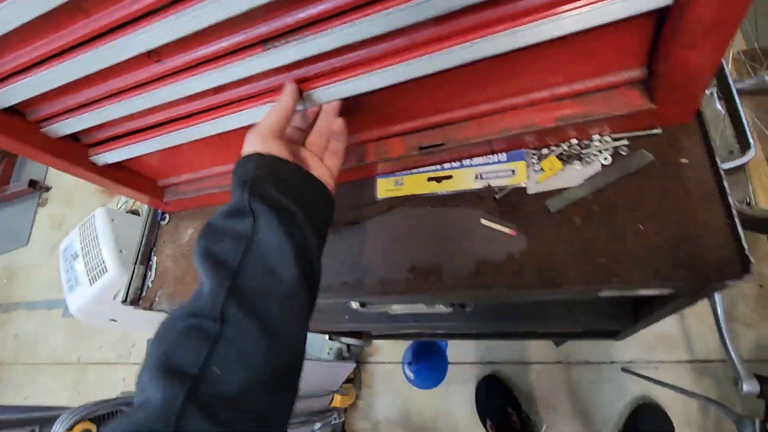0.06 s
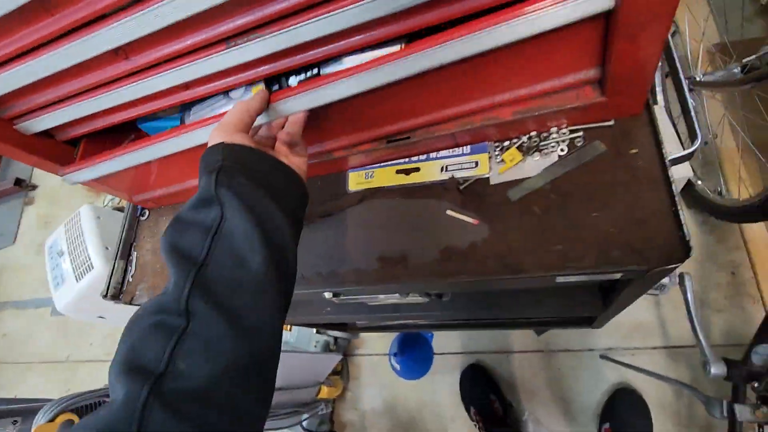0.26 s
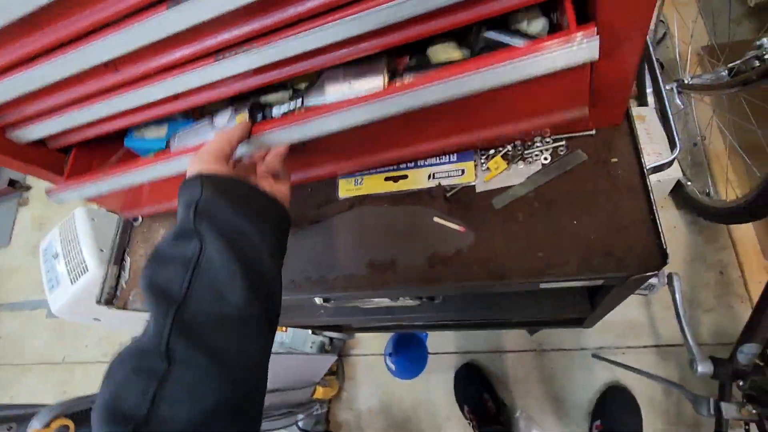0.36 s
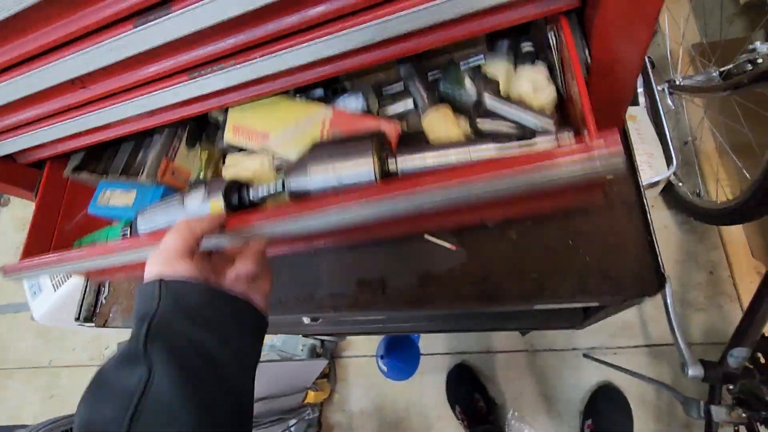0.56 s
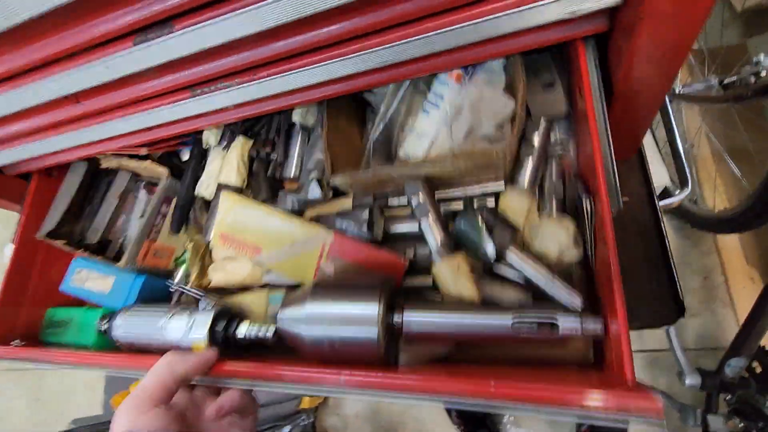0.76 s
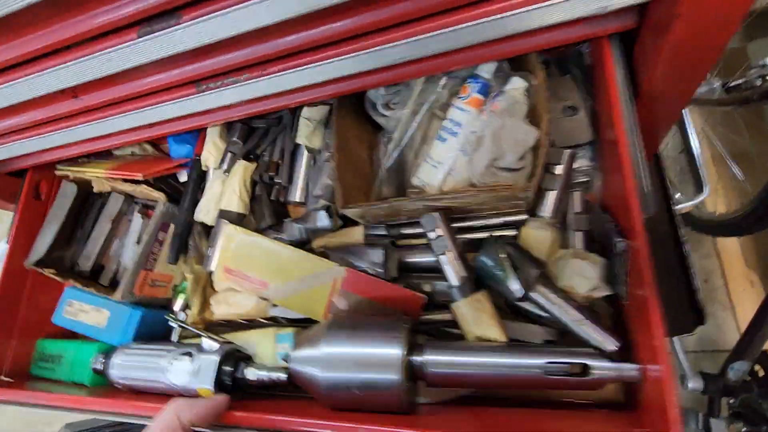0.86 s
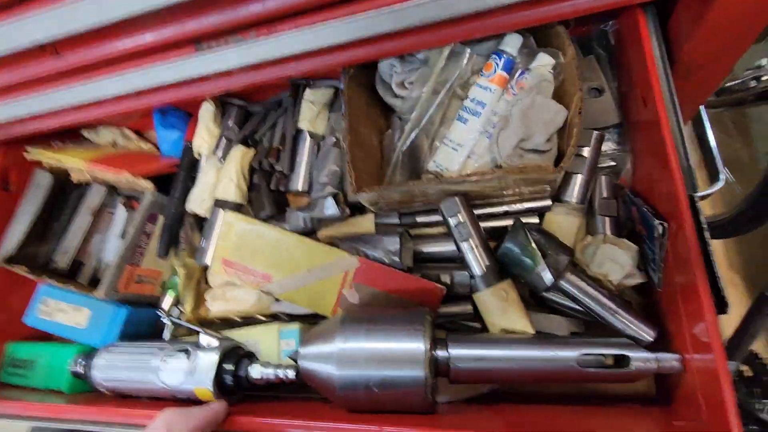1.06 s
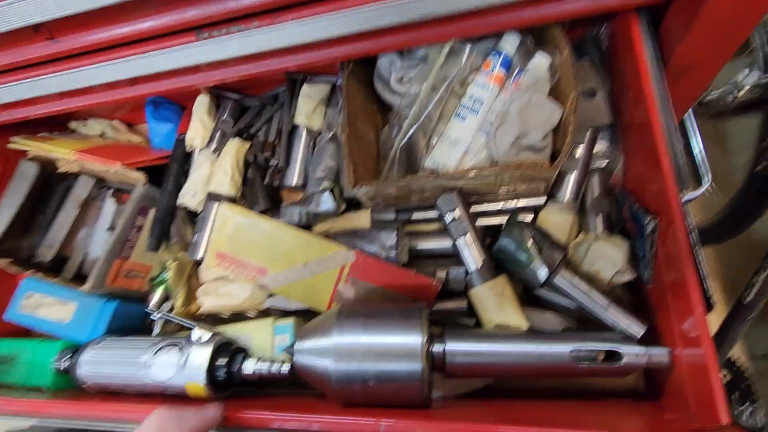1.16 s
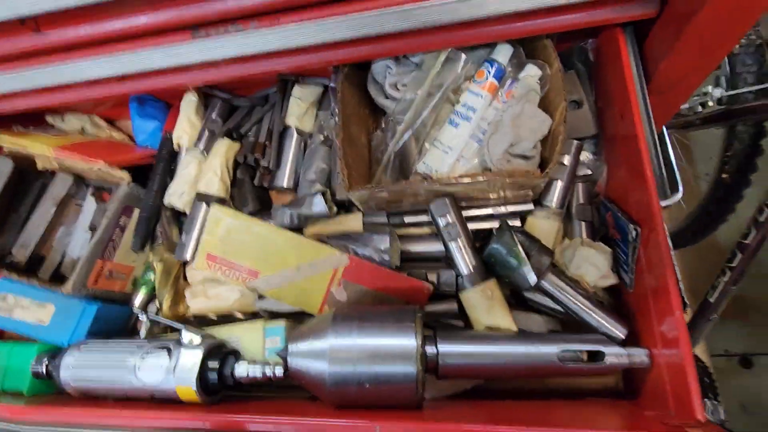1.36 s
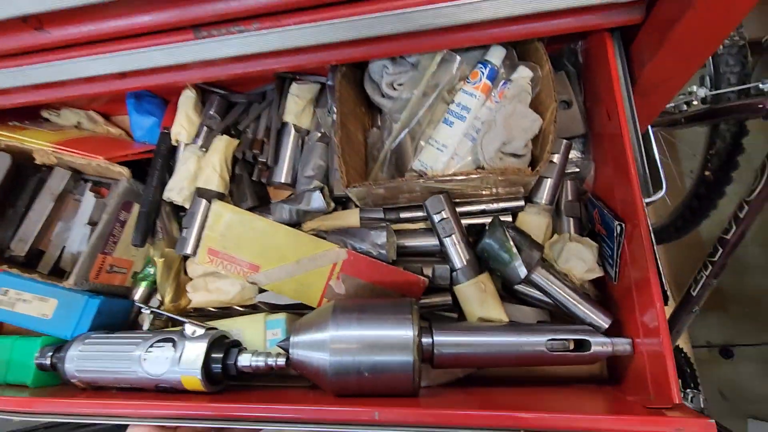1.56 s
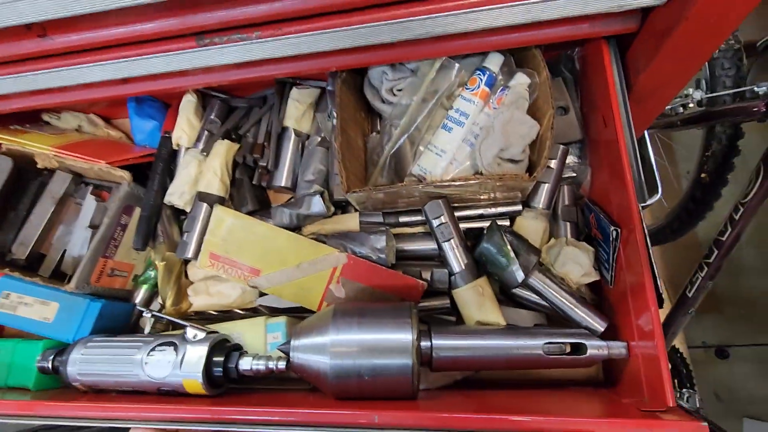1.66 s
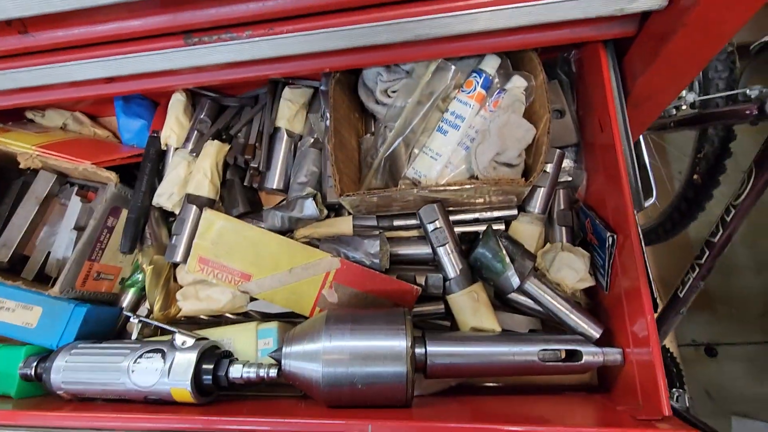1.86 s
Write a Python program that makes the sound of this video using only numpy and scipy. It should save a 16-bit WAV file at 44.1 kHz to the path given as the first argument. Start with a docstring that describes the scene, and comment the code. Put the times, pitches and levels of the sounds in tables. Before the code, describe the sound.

A loaded steel tool drawer is yanked open with a loud clank, rumbling and rattling to a stop.

```python
"""Quiet room tone with a wavering low hum, then a loaded steel tool drawer pulled open close by: its catch lets
go with a clank, it rumbles out on its runners while tools shift and clink, stops, and loose pieces settle.
Blows ring decaying panel modes; clinks are steel modes plus a noise crash; rumble, scrape and rustle are
shaped noise. Bright sounds also arrive by scattered paths, all in a short room reverberation."""
import sys
import numpy as np
from scipy import signal
from scipy.fft import rfft, irfft, next_fast_len
from scipy.io import wavfile
from scipy.ndimage import map_coordinates

SR = 44100
rng = np.random.default_rng(int(sys.argv[2]) if len(sys.argv) > 2 else 0)


def store_pcm(level_fs):
    """Save levels as 16-bit WAV."""
    pcm = np.round(np.clip(level_fs, -1, 1) * 32767).astype(np.int16)
    wavfile.write(sys.argv[1], SR, np.atleast_2d(pcm).T)


N = 83790

# room tone spectrum: (frequency [Hz], relative level [dB])
ROOM_SPECTRUM = [(25, -6), (45, 5), (74, 1), (163, -7.5), (338, -15), (785, -40), (1300, -34.5),
                 (2140, -32.5), (3300, -31.5), (4500, -40), (7700, -43.5), (8400, -72.5), (10200, -58),
                 (10800, -41.5), (11800, -34.5), (13000, -48.5), (15600, -42), (16000, -62)]
# left-right likeness of the room tone: (frequency [Hz], correlation [-])
ROOM_ALIKE = [(100, 1), (600, 0.76), (2000, 0.37), (10000, 0.1)]
# sharp steel contacts: (time [s], level [dB], centre [Hz], crash t60 [s], ringing relative to crash [dB])
CLINK_EVENTS = [(0.0251, -51.5, 3950, 0.059, -17), (0.196, -35.5, 2900, 0.042, -3),
                (0.213, -35.5, 2240, 0.036, 1), (0.215, -37, 5340, 0.024, 2),
                (0.2426, -16, 2600, 0.032, -0.5), (0.2471, -9, 3380, 0.032, -0.5),
                (0.253, -11.5, 4240, 0.037, -2), (0.2586, -13.5, 2590, 0.052, 0.5),
                (0.265, -14, 1946, 0.076, 0.5), (0.286, -29.5, 2340, 0.029, -2.5),
                (0.3406, -39.5, 4750, 0.041, 2), (0.5595, -33.5, 4060, 0.018, -15),
                (0.604, -45, 2860, 0.038, 3), (0.636, -41, 6360, 0.041, 1), (0.672, -37.5, 3060, .02, 1.5),
                (0.7122, -27.5, 3600, 0.046, -11), (0.7218, -28, 2620, 0.083, -5.5),
                (0.7914, -25.5, 1437, 0.029, 2.5), (0.799, -29.5, 2040, 0.028, -5),
                (0.8565, -28.5, 3060, 0.03, -0.5), (0.88, -37.5, 3180, 0.028, 0.5),
                (0.9051, -34.5, 1228, 0.036, 3.5), (0.9192, -31, 3600, 0.023, -3.5),
                (0.9437, -32.5, 2970, 0.012, 1), (0.963, -38.5, 2240, 0.035, -6),
                (0.981, -42, 2900, 0.015, -3), (.987, -37, 1200, 0.013, -0.5), (1.068, -46, 2530, 0.014, 4),
                (1.079, -44, 2770, 0.015, -0.5), (1.1984, -45, 2600, 0.027, -9.5),
                (1.43, -46.5, 6700, 0.022, -8.5), (1.659, -40.5, 5900, 0.017, -16),
                (1.807, -58, 1435, 0.037, 3), (1.868, -50.5, 6300, 0.021, -20)]
# modes of the steel contents: (frequency [Hz], relative level [dB], longest t60 [s])
STEEL_MODES = [(955, -1, .08), (1396, -3, 0.15), (1760, -1, 0.048), (1944, 0.5, 0.092),
               (2268, -14.5, 0.055), (2497, -2.5, .09), (2676, -7, 0.064), (2765, -3, .08),
               (3056, -5.5, 0.052), (3510, -4, .07), (3810, -14, 0.039), (4180, -12.5, .06),
               (5107, -5, 0.088), (5220, -7, 0.054)]
# crash spectrum before focus, dulling and thinning: (frequency [Hz], relative level [dB])
CRASH_SPECTRUM = [(300, -36.5), (700, 1), (1300, -16), (2000, -15.5), (2840, -12.5), (3240, -14.5),
                  (6160, -19.5), (7400, -23.5), (8880, -40), (11900, -26.5), (15000, -34.5), (16400, -48.5)]
# blows on the drawer panels: (time [s], level [dB], centre [Hz], share of the free ringing time [-])
KNOCK_EVENTS = [(0.031, -32, 250, 0.27), (0.197, -15, 233, 0.14), (0.215, -14, 196, 0.36),
                (0.2446, -7, 507, 0.87), (.2515, -10, 262, 0.88), (0.2627, -2, 298, 0.97),
                (0.27, -22, 280, 0.71), (0.299, -16.5, 600, 0.45), (0.335, -14.5, 169.4, 0.82),
                (0.57, -22.5, 172.6, 1), (0.583, -13.5, 135, 0.4), (0.604, -20, 132, 1),
                (0.708, -15, 253, 0.29), (0.714, -17, 720, 0.16), (0.737, -4, 151, 0.61),
                (0.788, -18.5, 446, 0.44), (0.79, -22, 885, 0.28), (0.819, -12, 145, 0.2),
                (0.914, -29, 194, 0.2), (0.962, -25.5, 374, 0.92), (.964, -32, 820, 0.51),
                (0.975, -12.5, 110, 0.83), (1.135, -45, 730, 0.16), (1.626, -33, 373, 0.8)]
# modes of the sheet-steel panels: (frequency [Hz], relative level [dB], free t60 [s])
PANEL_MODES = [(96.8, -9, 0.16), (128, -22.5, 0.45), (158.5, -10.5, 0.14), (210.6, -14, 0.14),
               (265, -2, 0.2), (359, -10.5, 0.18), (430, -9, 0.084), (479.4, -5.5, 0.14), (548, -16, 0.27),
               (721.6, -1.5, 0.1), (830, 1, 0.12)]
# the drawer rolling: (time [s], rumble level [dB], scrape level [dB], fizz level [dB])
SLIDE_LEVELS = [(.185, -55, -63, -99), (.2, -32, -45.5, -80), (.25, -33.5, -42, -54.5),
                (.32, -32, -45, -68), (.38, -37, -48, -72), (.46, -46.5, -51.5, -76),
                (.54, -40.5, -48.5, -72), (.62, -32.5, -43.5, -66), (.645, -35, -42.5, -55.5),
                (.7, -29, -37.5, -56), (.745, -25, -33.5, -53), (.78, -29, -39.5, -50),
                (.83, -31.5, -41.5, -62.5), (.89, -33.5, -45, -60), (.94, -37.5, -44, -67.5),
                (.98, -46, -55, -68), (1.0, -40, -61.5, -86), (1.05, -49, -62, -86.5),
                (1.15, -49, -75, -99.5), (1.4, -63, -90.5, -100)]
# runner rumble spectrum: (frequency [Hz], relative level [dB])
RUMBLE_SPECTRUM = [(18, -62), (30, -27), (86, 2.5), (168, -1.5), (223, -4), (268, -4), (328, -7),
                   (442, -16), (571, -19.5), (900, -25), (1170, -42), (1980, -120)]
# runner scrape spectrum: (frequency [Hz], relative level [dB])
SCRAPE_SPECTRUM = [(240, -29.5), (400, 2), (576, -2), (728, -0.5), (1040, -8), (1290, -4), (1590, -8),
                   (3520, -8), (4070, -13.5), (7310, -18), (9000, -38.5), (11700, -66.5), (19800, -120)]
# treble fizz spectrum of the same rubbing: (frequency [Hz], relative level [dB])
FIZZ_SPECTRUM = [(7000, -25.5), (8950, -12.5), (11800, 1), (15200, -4.5), (16400, -14.5)]
# modes of a heavy tool that rings on after the clank: (frequency [Hz], level [dB], t60 [s])
TOOL_MODES = [(1300, -37, .3), (1750, -46, .4), (1933, -47, .3), (2445, -39, .7)]
# contents shuffling to rest: (time [s], level [dB])
SETTLE_LEVELS = [(.9, -100), (.95, -61), (1.02, -62.5), (1.2, -55.5), (1.37, -60), (1.41, -64.5),
                 (1.55, -66), (1.62, -81.5), (1.9, -98)]
# rustle spectrum of the contents: (frequency [Hz], relative level [dB])
SHUFFLE_SPECTRUM = [(240, -31.5), (400, -4), (583, -6), (636, -9.5), (2040, -10), (3540, -20),
                    (3870, -20.5), (4790, -18.5), (8000, -35), (10400, -64.5), (17600, -120)]
# left-right likeness of the bright drawer sounds: (frequency [Hz], correlation [-])
BRIGHT_ALIKE = [(350, 0.66), (700, 0.68), (1100, 0.18), (2000, 0.061), (6000, 0.062), (15000, .1)]
# decay of the room's answer: (frequency [Hz], t60 [s])
WALL_DECAY = [(150, 1), (1000, 0.75), (4000, 0.31), (12000, 0.21)]
# colour difference of the two ports: (frequency [Hz], left minus right [dB])
PORT_DIFFERENCE = [(60, 1), (250, 2), (1500, 1), (2800, -4), (5200, -3), (6500, 5), (8500, 14.5),
                   (11500, 6.5), (13000, 8.5), (16000, 9.5)]

ROOM_DB = -50
HUM_HZ, HUM_WIDTH_HZ, HUM_DB = 58, 4.8, -56

CRASH_DB, CRASH_RISE_S = -1, 0.00059
CRASH_FOCUS_DB, CRASH_FOCUS_OCTAVES = 6.5, 0.39  # louder near its centre
THIN_DB_PER_OCTAVE = 2.5  # thinner below its centre
DULL_HZ, DULL_DB_PER_DB = 8000, .35  # weaker contacts lose their top above this
RING_DB, CLINK_OCTAVES = -11, 0.92  # octaves: how far from its centre a contact excites modes
FULL_RING_S = .05  # a shorter crash t60 shortens the ringing in proportion
PIECE_DB, PIECE_T60_S = 3.5, 0.066  # struck piece's own note; longest t60

KNOCK_DB, KNOCK_OCTAVES, KNOCK_RISE_S = -3, 0.34, 0.001

GRIT_PER_S, GRIT_DB, GRIT_SPREAD_DB = 500, -4, 4
TOOL_START_S = .26
SQUEAK_HZ, SQUEAK_WIDTH_HZ, SQUEAK_DB = 4750, 90, -70
SQUEAK_START_S, SQUEAK_END_S = 1.19, 1.42

SCATTER_T60_S = .02
LEAD_S = 0.00018  # low drawer sound leads at the left port
WALLS_DB = -16.5
LOW_CUT_HZ, TOP_HZ, CEILING = 34.7, 16450, .9


def amp(db):
    """Amplitude factor of a level in dB."""
    return 10 ** (np.asarray(db) / 20)


def unit(x):
    """x at rms 1."""
    return x / np.sqrt(np.mean(x ** 2) + 1e-20)


def along(points, hz):
    """(Hz, value) points interpolated on a log frequency axis."""
    f, v = np.transpose(points)
    return np.interp(np.log(hz + 1), np.log(f + 1), v)


def curves(rows):
    """One value per sample for each column after the time."""
    s, *cols = np.transpose(rows)
    return [np.interp(np.arange(N) / SR, s, c) for c in cols]


def wobble(knots_per_s):
    """A smooth random curve through normal knots."""
    knots = rng.standard_normal(int(N * knots_per_s / SR) + 4)
    return map_coordinates(knots, [np.arange(N) * knots_per_s / SR])


def filtered(x, response):
    """x times a complex response of frequency."""
    m = next_fast_len(N + SR // 2)
    return irfft(rfft(x, m) * response(np.fft.rfftfreq(m, 1 / SR)), m)[..., :N]


def coloured(x, spectrum):
    """x shaped by a spectrum, rms 1."""
    return unit(filtered(x, lambda hz: amp(along(spectrum, hz))))


def narrow(centre_hz, width_hz):
    """A narrow band of noise, rms 1."""
    noise = rng.standard_normal(N)
    return unit(filtered(noise, lambda hz: np.exp(-((hz - centre_hz) / width_hz) ** 2)))


def ported(a, b, alike):
    """Two signals as the common and the differing part at the two ports."""
    def mix(hz):
        angle = np.arccos(np.clip(along(alike, hz), -1, 1)) / 2
        return np.array([np.cos(angle), np.sin(angle)])

    mid, side = filtered(np.array([a, b]), mix)
    return np.array([mid + side, mid - side])


def scattered(x):
    """x along a bundle of random short paths."""
    n = SR // 20
    paths = rng.standard_normal(n) * amp(-60 * np.arange(n) / SR / SCATTER_T60_S)
    return signal.fftconvolve(x, paths / np.linalg.norm(paths))[:len(x)]


def ring(modes, centre_hz, octaves, scatter_db, lasts=1, rise_s=1 / SR):
    """One strike: decaying sine modes, those near its centre loudest."""
    hz, db, t60 = np.transpose(modes)[:, :, None]
    t = np.arange(SR // 2) / SR
    near = np.exp(-.5 * (np.log2(hz / centre_hz) / octaves) ** 2)
    start_db = db + scatter_db * rng.standard_normal(hz.shape)
    decay = amp(start_db - 60 * t / (t60 * lasts))
    tone = (near * decay * np.sin(2 * np.pi * hz * t)).sum(0)
    return tone * (1 - np.exp(-t / rise_s))


def shop():
    """Steady noise, near mono in the bass, and a wavering low hum of narrow-band noise."""
    tone = ported(*coloured(rng.standard_normal((2, N)), ROOM_SPECTRUM), ROOM_ALIKE)
    hum = amp(HUM_DB) * narrow(HUM_HZ, HUM_WIDTH_HZ)
    return amp(ROOM_DB + 0.5 * wobble(9.23)) * tone + hum


def crash_noise(t, level_db, centre_hz, t60_s):
    """A short noise burst, focused on the contact's centre and duller when weak."""
    f = np.fft.rfftfreq(len(t), 1 / SR) + 1
    focus = np.exp(-.5 * (np.log2(f / centre_hz) / CRASH_FOCUS_OCTAVES) ** 2)
    below_loudest_db = level_db - max(row[1] for row in CLINK_EVENTS)
    colour_db = along(CRASH_SPECTRUM, f) + CRASH_FOCUS_DB * focus
    colour_db += DULL_DB_PER_DB * below_loudest_db / (1 + (DULL_HZ / f) ** 20)
    colour_db -= THIN_DB_PER_OCTAVE * np.log2(1 + centre_hz / f)
    noise = unit(irfft(rfft(rng.standard_normal(len(t))) * amp(colour_db)))
    return noise * amp(CRASH_DB - 60 * t / t60_s) * (1 - np.exp(-t / CRASH_RISE_S))


def clinks():
    """Each contact: ringing steel and a short crash, direct and by its own scattered paths."""
    out, t = np.zeros((2, N + SR)), np.arange(SR // 2) / SR
    for s, db, hz, t60, ring_db in CLINK_EVENTS:
        crash = crash_noise(t, db, hz, t60)
        lasts = np.clip(t60 / FULL_RING_S, .2, 1)
        steel = ring(STEEL_MODES, hz, CLINK_OCTAVES, scatter_db=2, lasts=lasts)
        piece = amp(PIECE_DB - 60 * t / (PIECE_T60_S * lasts)) * np.sin(2 * np.pi * hz * t)
        hit = amp(db) * (crash + amp(RING_DB + ring_db) * (steel + piece))
        out[:, round(s * SR):][:, :len(t)] += [hit, scattered(hit)]
    return out[:, :N]


def knocks():
    """Dull blows ringing the sheet-steel panels, damped by hand and load."""
    out = np.zeros(N + SR)
    for s, db, hz, lasts in KNOCK_EVENTS:
        blow = ring(PANEL_MODES, hz, KNOCK_OCTAVES, scatter_db=3, lasts=lasts, rise_s=KNOCK_RISE_S)
        out[round(s * SR):][:SR // 2] -= amp(db + KNOCK_DB) * blow
    return out[:N]


def slide():
    """Runners under load: lumpy rumble; gritty scrape with fizz on top."""
    rumble_db, scrape_db, fizz_db = curves(SLIDE_LEVELS)
    grains = rng.random(N) < GRIT_PER_S / SR
    grit = grains * amp(GRIT_SPREAD_DB * rng.exponential(size=N)) * rng.standard_normal(N)
    rub = rng.standard_normal(N) + amp(GRIT_DB) * unit(grit)
    shake_db = 1.5 * wobble(60)
    rumble = amp(rumble_db + 2.5 * wobble(30)) * coloured(rng.standard_normal(N), RUMBLE_SPECTRUM)
    scrape = amp(scrape_db + shake_db) * coloured(rub, SCRAPE_SPECTRUM)
    fizz = amp(fizz_db + shake_db) * coloured(rub, FIZZ_SPECTRUM)
    return rumble, scrape + fizz


def tool():
    """Struck once by the clank; its ringing flutters as it rocks."""
    note = ring(TOOL_MODES, 2000, 10, scatter_db=1, rise_s=.01)
    note = np.pad(note, (round(TOOL_START_S * SR), N))[:N]
    return note * amp(3 * wobble(25))


def settle():
    """Contents shuffling to rest: a dull noise rustle that swells and dies away."""
    level_db = curves(SETTLE_LEVELS)[0] + 0.94 * wobble(80)
    return amp(level_db) * coloured(rng.standard_normal(N), SHUFFLE_SPECTRUM)


def squeak():
    """A faint thin whine of narrow-band noise that swells and fades."""
    progress = (np.arange(N) / SR - SQUEAK_START_S) / (SQUEAK_END_S - SQUEAK_START_S)
    gate = np.sin(np.pi * np.clip(progress, 0, 1))
    return amp(SQUEAK_DB) * gate * narrow(SQUEAK_HZ, SQUEAK_WIDTH_HZ)


def walls(x):
    """Reverberation: noise tails in which each frequency dies at its own speed."""
    hz, t, z = signal.stft(rng.standard_normal((2, SR // 2)), SR, nperseg=256)
    decay = amp(-60 * t / along(WALL_DECAY, hz)[:, None])
    less_bass = (hz / (hz + 700))[:, None]
    tail = signal.istft(z * decay * less_bass, SR, nperseg=256)[1]
    delayed = np.pad(x, (100, 0))[None]  # samples
    return signal.fftconvolve(delayed, tail / np.linalg.norm(tail[0]), axes=1)[:, :N]


def scene():
    """Bright sounds of the wide drawer reach the ports by scattered paths; walls and room tone surround it."""
    rumble, scrape = slide()
    low, rustle = knocks() + rumble, scrape + settle()
    bright, spread = clinks() + [rustle, scattered(rustle)]
    sides = np.array([[1], [-1]])
    panels = filtered(low, lambda hz: np.exp(1j * np.pi * hz * LEAD_S * sides))
    drawer = panels + ported(bright, spread, BRIGHT_ALIKE)
    return drawer + amp(WALLS_DB) * walls(low + bright) + tool() + squeak() + shop()


def record(dry):
    """The two ports differ in colour; deep bass is cut; peaks are softly clipped; the top is band-limited."""
    def port_response(hz):
        half_db = along(PORT_DIFFERENCE, hz) / 2
        bass_cut = (1j * hz / (LOW_CUT_HZ + 1j * hz)) ** 2
        return amp(half_db * np.array([[1], [-1]])) * bass_cut

    x = filtered(dry, port_response)
    x = x / (1 + np.abs(x / CEILING) ** 4) ** (1 / 4)
    return filtered(x, lambda hz: hz < TOP_HZ)


dry = scene()
out = record(dry)
store_pcm(out)
```